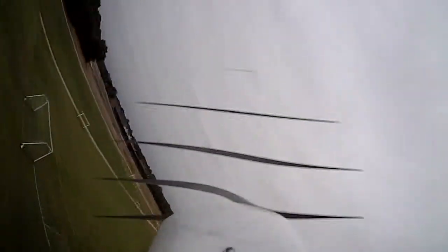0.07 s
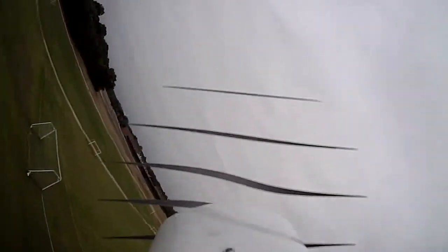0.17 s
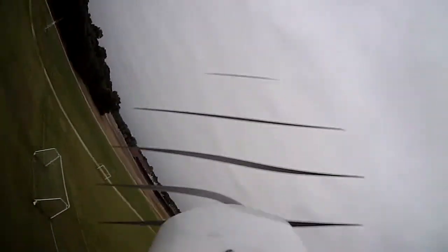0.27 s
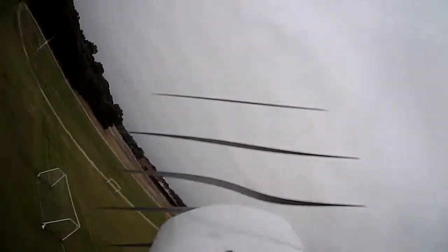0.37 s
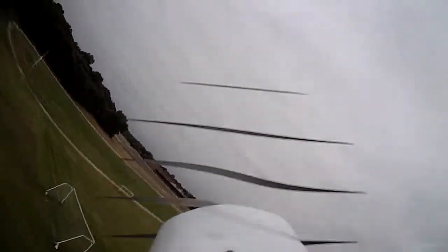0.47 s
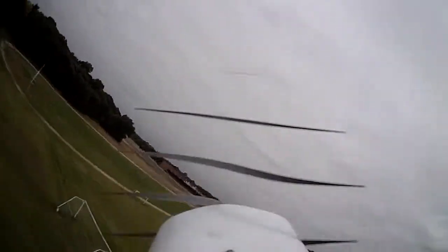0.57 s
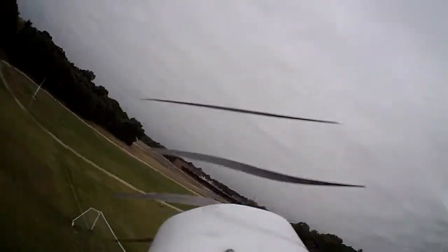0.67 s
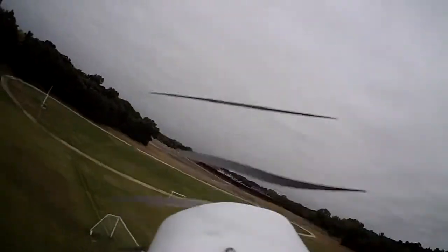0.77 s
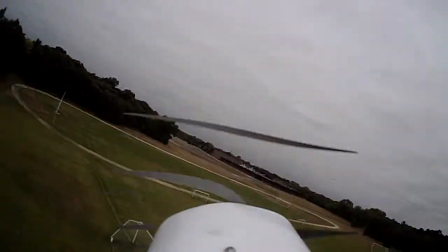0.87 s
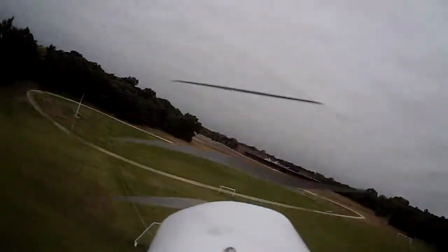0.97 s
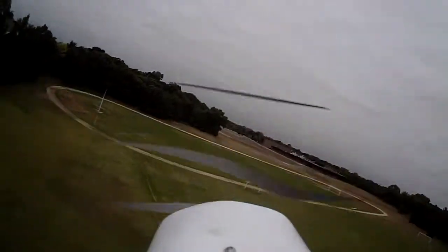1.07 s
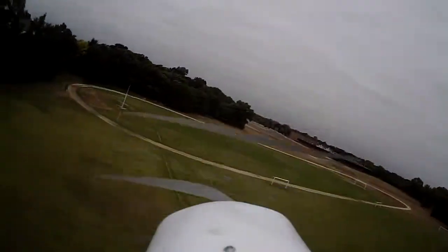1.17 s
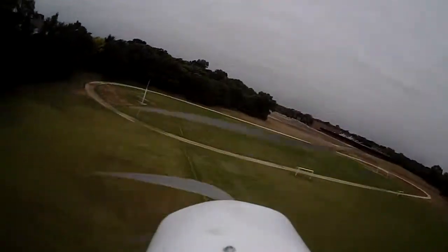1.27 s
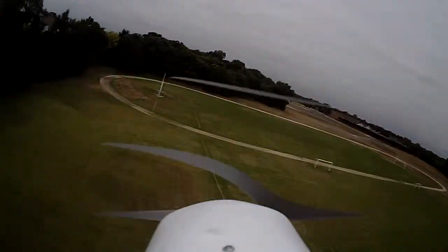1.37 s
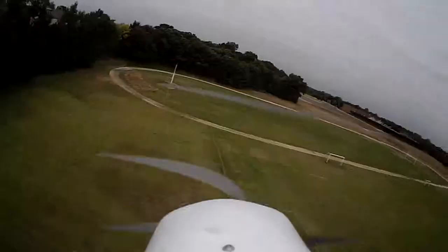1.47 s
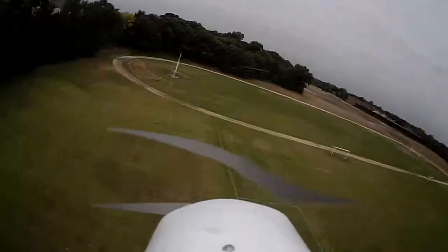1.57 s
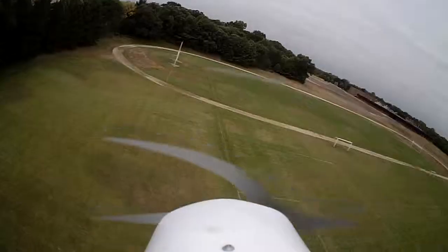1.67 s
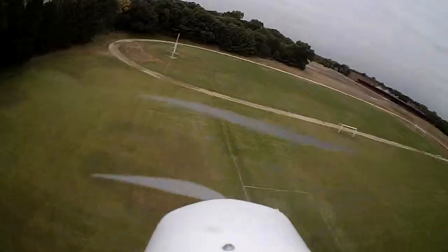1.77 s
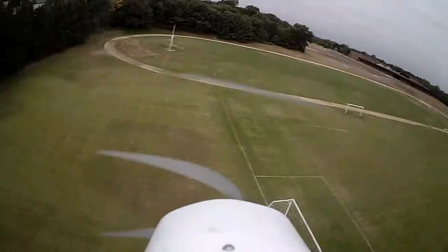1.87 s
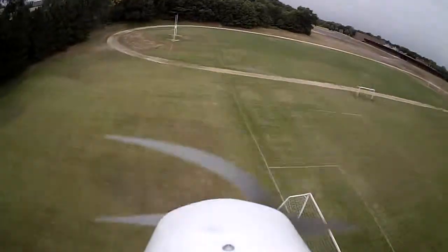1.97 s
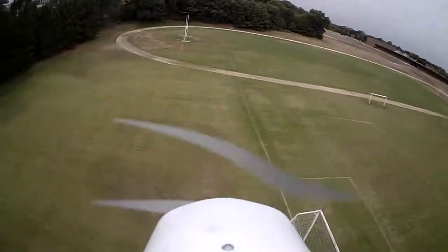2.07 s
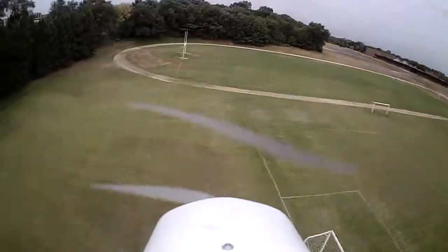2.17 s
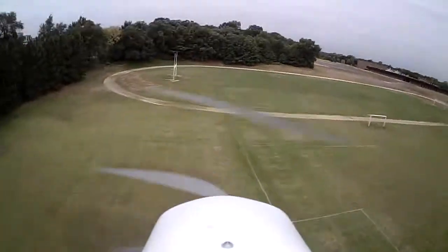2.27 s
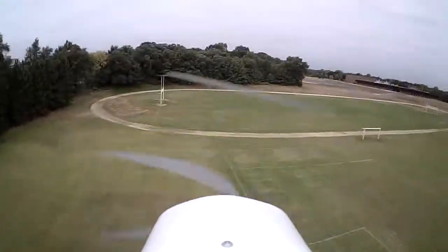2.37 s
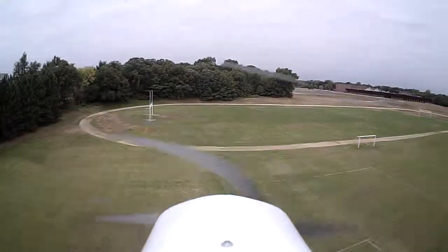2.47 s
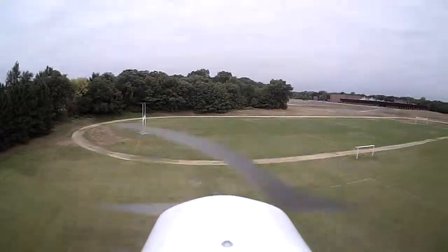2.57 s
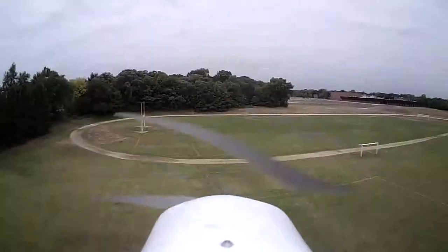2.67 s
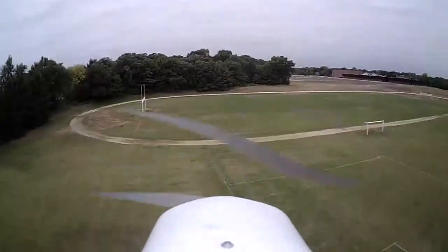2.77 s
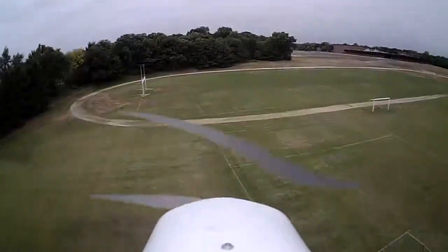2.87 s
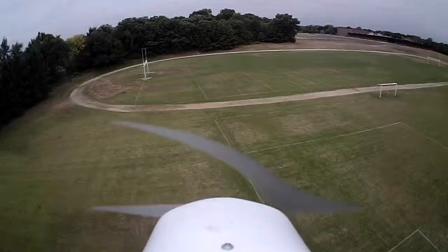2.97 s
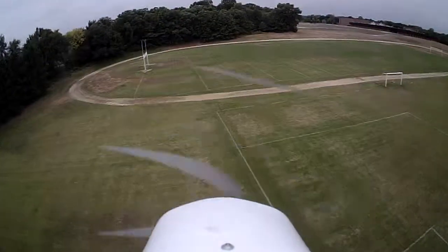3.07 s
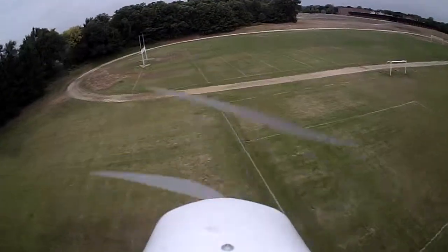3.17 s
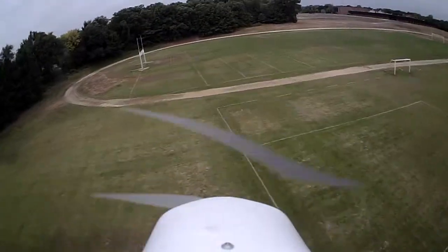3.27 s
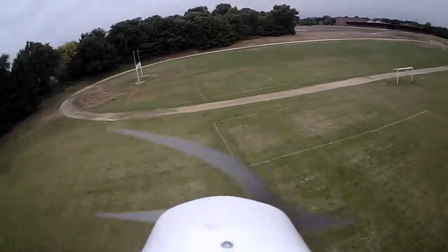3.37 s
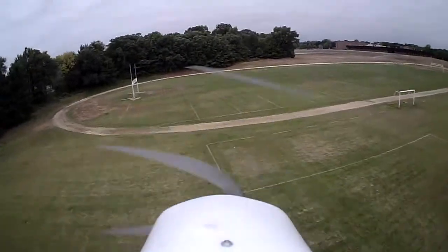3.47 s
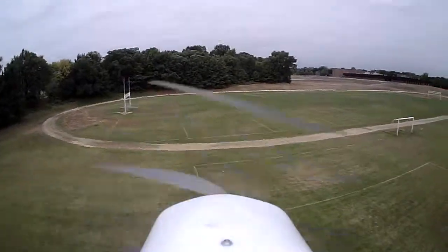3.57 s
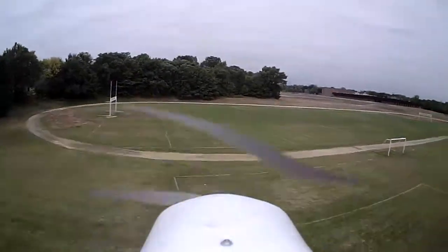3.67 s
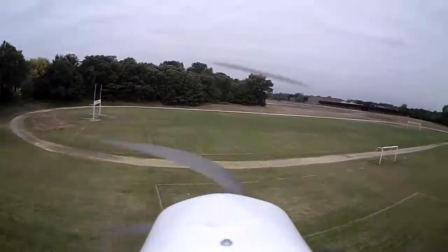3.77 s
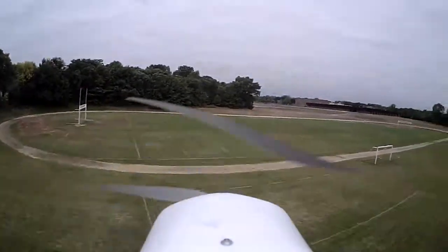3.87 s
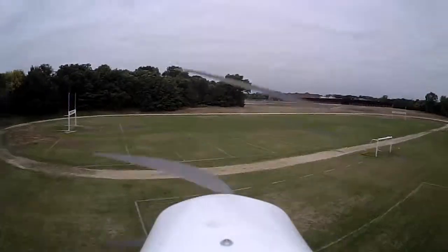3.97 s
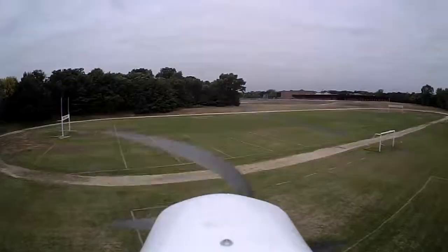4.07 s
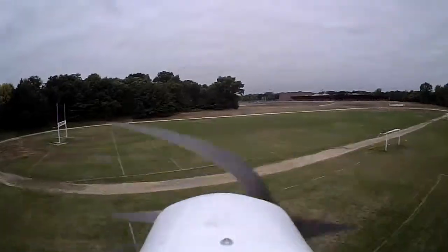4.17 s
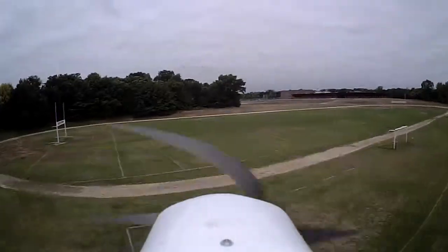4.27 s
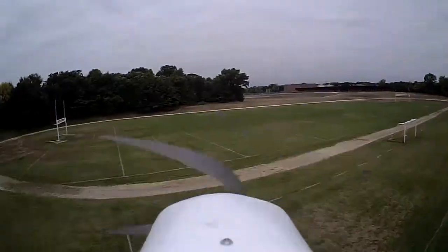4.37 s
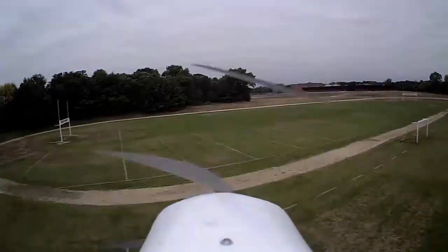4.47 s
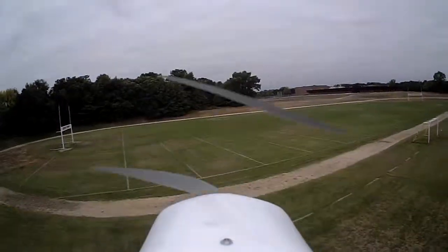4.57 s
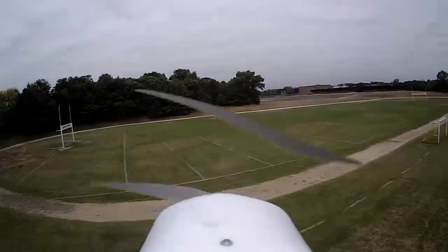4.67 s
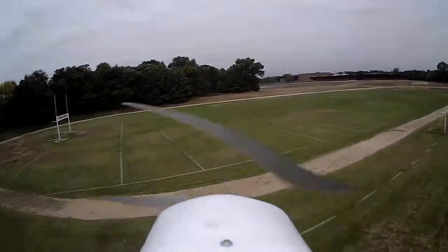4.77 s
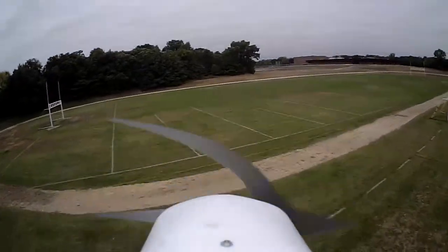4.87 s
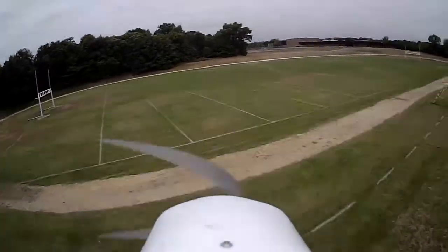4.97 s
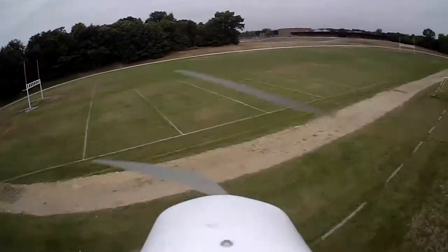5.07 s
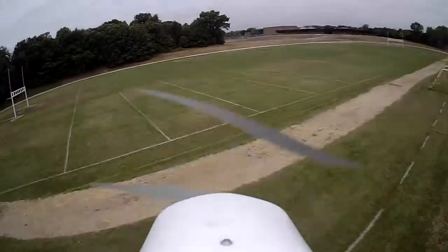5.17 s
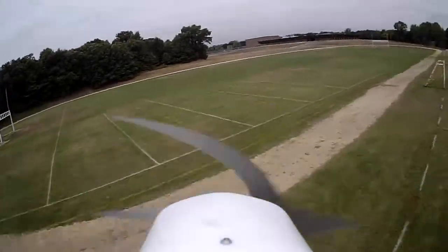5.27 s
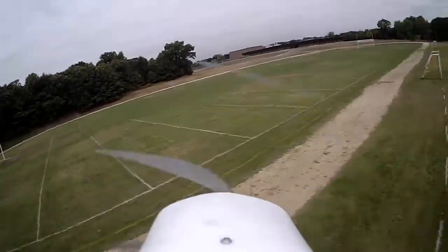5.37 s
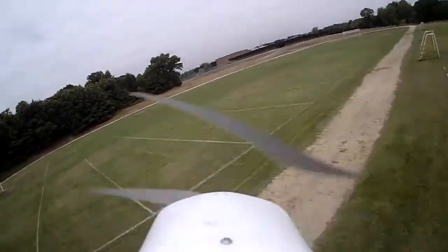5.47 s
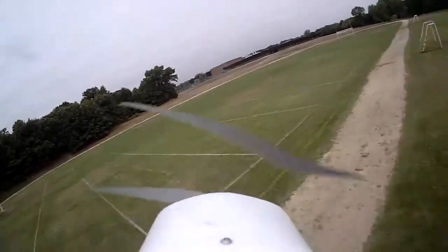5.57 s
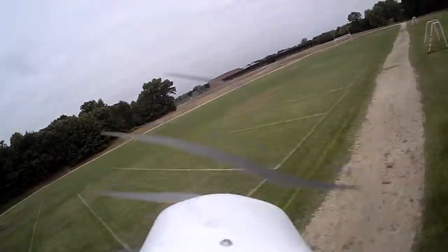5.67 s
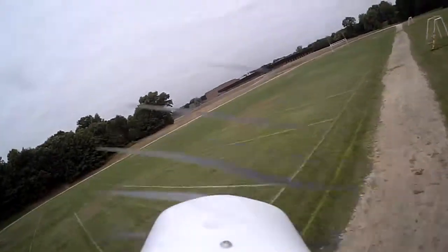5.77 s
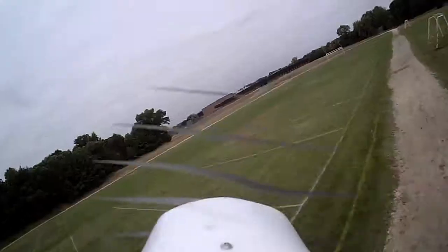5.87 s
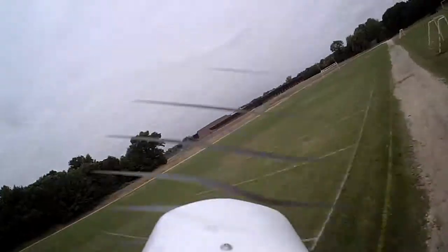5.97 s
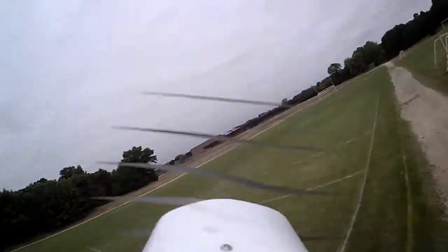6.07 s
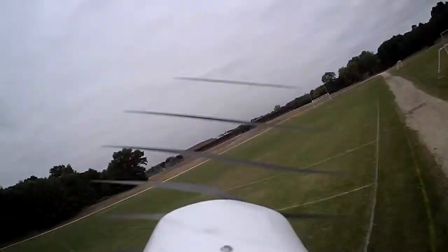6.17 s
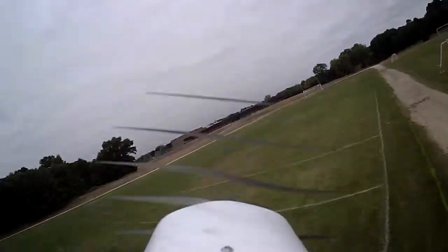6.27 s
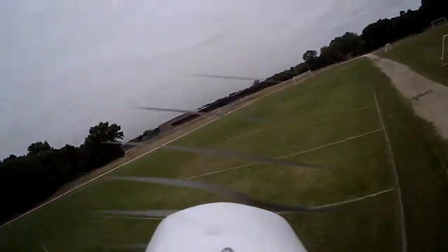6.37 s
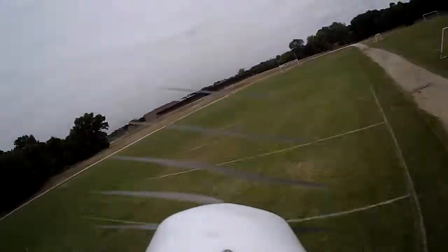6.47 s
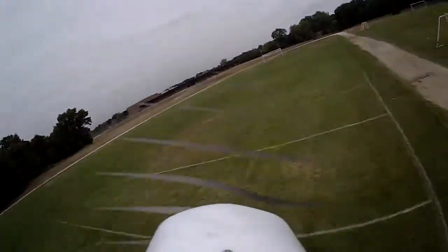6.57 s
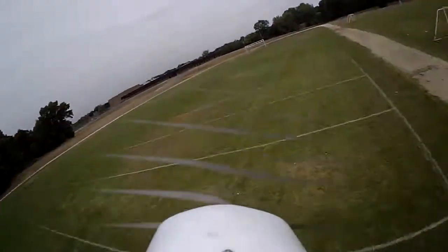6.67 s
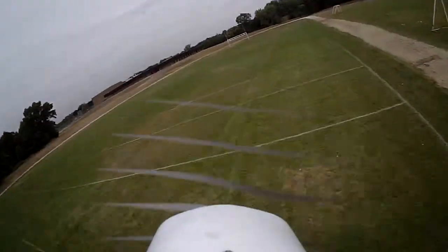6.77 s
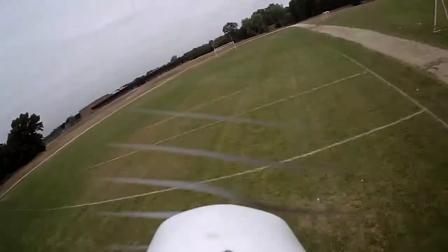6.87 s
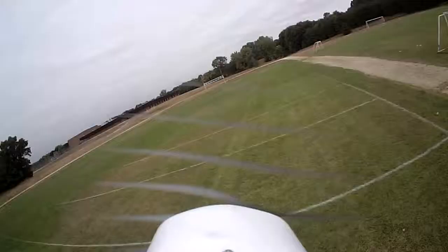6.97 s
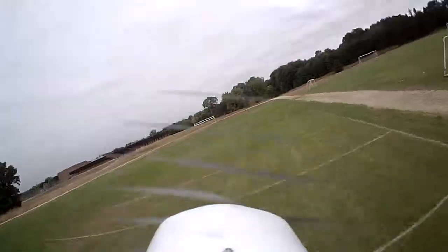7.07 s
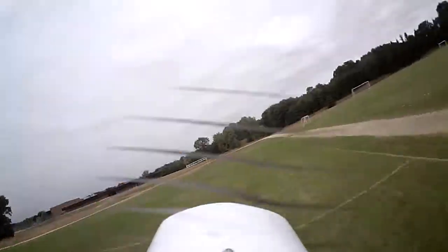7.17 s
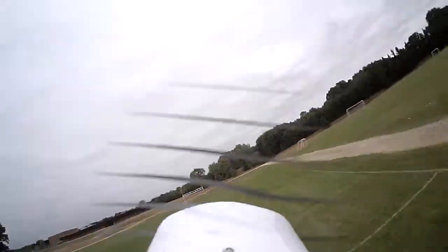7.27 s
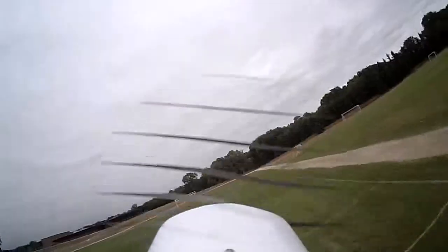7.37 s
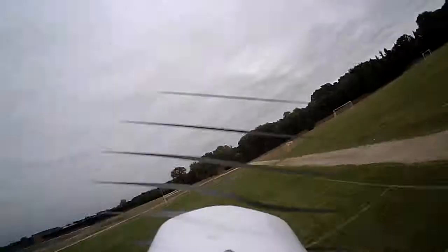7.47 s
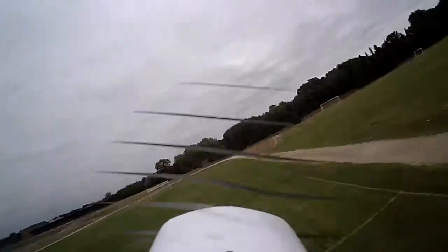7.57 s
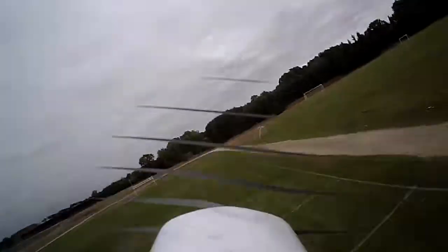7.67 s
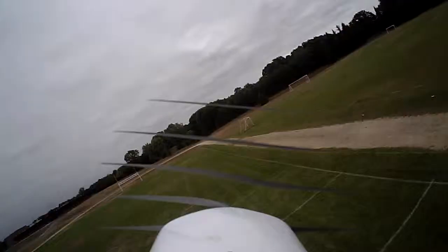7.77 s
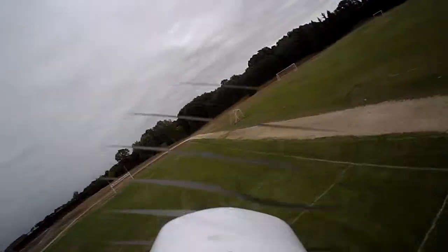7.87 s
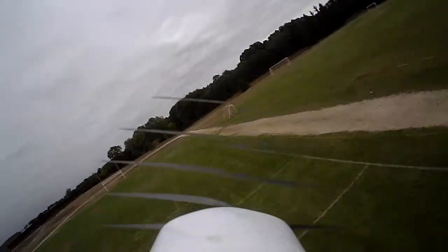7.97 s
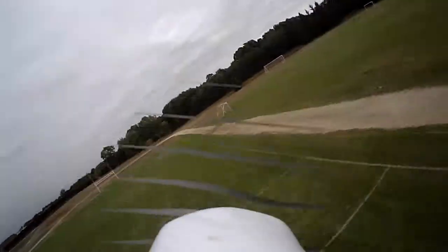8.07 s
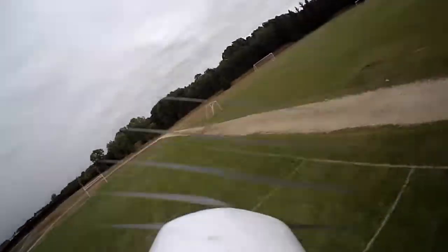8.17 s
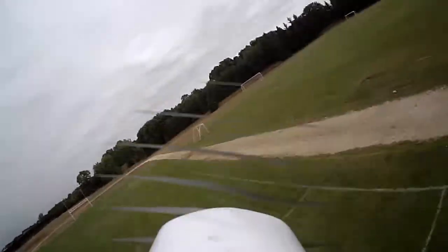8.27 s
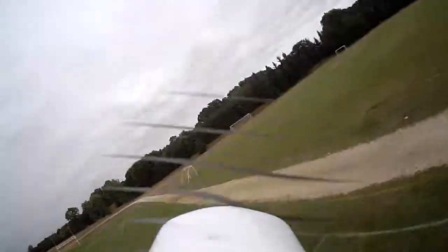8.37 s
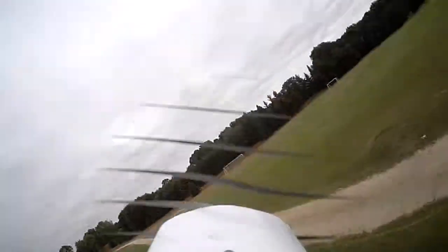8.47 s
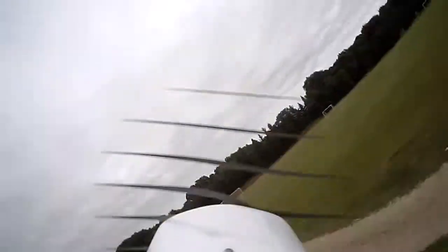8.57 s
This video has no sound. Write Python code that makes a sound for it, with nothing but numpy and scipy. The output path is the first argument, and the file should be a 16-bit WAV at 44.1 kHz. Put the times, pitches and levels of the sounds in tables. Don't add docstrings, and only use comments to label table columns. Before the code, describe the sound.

Heard from the nose of a small electric model plane over an open field: a buzzing propeller and thin motor whistle, quickly cut. The blades run down to a low flutter while wind puffs and tiny crackles brush the microphone. Late on, the motor whines back up and the buzz returns with heavy, crackling wind roar that overloads the microphone.

```python
import sys
import numpy as np
from scipy import signal
from scipy.fft import rfft, irfft, next_fast_len
from scipy.io import wavfile
from scipy.ndimage import uniform_filter1d, map_coordinates

SR = 44100
rng = np.random.default_rng(int(sys.argv[2]) if len(sys.argv) > 2 else 0)


def master_out(mix):
    frames = np.transpose(np.atleast_2d(mix))
    ceiling = np.clip(frames, -1, 1)
    pcm = np.round(ceiling * 32767).astype(np.int16)
    wavfile.write(sys.argv[1], SR, pcm)


def volts(x):
    e = np.asarray(x, float) / 20
    return 10 ** e


N = 380141
CUT_S = 0.55

# blade rate in Hz, levels in dB of blade tone, 2nd harmonic,
# 3rd harmonic, depth in dB of wash chopping.
BLADE_LAW = [(65.6, -42.5, -48, -61, 5), (81.4, -40.5, -40, -50, 4), (96, -39, -38, -48, -2),
             (121, -27.5, -31.5, -35.5, 2), (172, -31, -34, -35, 0), (213, -28, -33.5, -38, 5),
             (250, -29, -30.5, -36, 1.5)]


def unit(x):
    return x / np.sqrt(np.mean(x ** 2) + 1e-20)


def law(rows, control):
    x, *cols = np.transpose(rows)
    return [np.interp(control, x, c) for c in cols]


def curves(rows):
    return law(rows, np.arange(N) / SR)


def swells(rows):
    middle_s, half_s, *db = np.transpose(rows)
    t = np.arange(0, N / SR + 0.002, 0.001)
    shape = np.exp(-abs((t[:, None] - middle_s) / half_s) ** 2.4)
    return curves(np.column_stack([t, shape @ np.transpose(db)]))


def wobble(rate):
    return map_coordinates(rng.standard_normal(int(N * rate / SR) + 4), [np.arange(N) * rate / SR])


def coloured(x, spectrum):
    m = next_fast_len(N + 8192)
    hz, db = np.transpose(spectrum)
    log_hz = np.log(np.fft.rfftfreq(m, 1 / SR) + 1)
    gain = volts(np.interp(log_hz, np.log(hz + 1), db, left=-120, right=-120))
    return irfft(rfft(x, m) * gain, m)[:N]


def patchy(depth_db):
    z = signal.stft(rng.standard_normal(N + 512), nperseg=512)[2]
    field = uniform_filter1d(rng.standard_normal(z.shape), size=6, axis=0)
    field = uniform_filter1d(field, size=8, axis=1)
    return signal.istft(z * volts(depth_db * unit(field)), nperseg=512)[1][:N]


def spool():
    middle_s, steepness_per_s = 5.743, 16.4
    return 1 / (1 + np.exp(steepness_per_s * (middle_s - np.arange(N) / SR)))


def throttle():
    open_s, ramp_s = 6.3, 0.092
    t = np.arange(N) / SR
    closing = 1 / (1 + np.exp((t - CUT_S) / ramp_s))
    opening = 1 / (1 + np.exp((open_s - t) / ramp_s))
    return closing + opening


def blade_rate():
    # time in seconds, blade rate in Hz.
    powered = [(0, 204.3), (.5, 205), (5.8, 222.1), (6, 223.9), (6.22, 228), (6.6, 228.8), (7.28, 265.1),
               (7.48, 272), (7.85, 255.8), (8.15, 264.5), (8.34, 251), (8.62, 241.5)]
    # time in seconds, blade rate in Hz.
    windmill = [(1, 81), (1.45, 87), (1.9, 79), (2.6, 80.3), (3.4, 78), (4.2, 69.5), (4.6, 68), (5.2, 68),
                (5.5, 65)]
    soft_s, coast_s = 0.04, 0.4
    coasting_s = soft_s * np.logaddexp(0, (np.arange(N) / SR - CUT_S) / soft_s)
    driven = np.exp(-coasting_s / coast_s) + spool()
    return curves(windmill)[0] * (1 - driven) + curves(powered)[0] * driven


def blade_angle(blade_hz):
    return 2 * np.pi * np.cumsum(blade_hz * (1 + 0.00889 * wobble(25))) / SR


def propeller(blade_hz, angle):
    # middle in seconds, half length in seconds, blade tone lift in dB,
    # overtone lift in dB.
    bites = [(.2, .42, 10, 3), (.1, .15, 0, 3), (.33, .07, 0, -12), (.45, .06, 0, 3), (.6, .11, 2, 10),
             (.77, .08, 0, 3), (1.03, .13, 2, 4), (1.6, .2, -6, -4), (1.85, .07, 0, 8), (2.1, .25, 8, 0),
             (3.15, .05, 6, 8), (3.32, .2, 8, 5), (3.9, .08, 3, -4), (4.25, .2, -4, -5), (5.4, .15, -4, -2),
             (4.6, .1, 2, 9), (4.98, .2, 8, 3), (5.72, .08, -5, -12), (6.05, .2, 12, -7), (6.21, .05, 3, 9),
             (7.1, .12, -2, -5), (7.38, .13, 16, 3), (8.26, .1, 2, 3), (8.45, .3, 13, 0)]
    bite_db, overtone_db = swells(bites)
    tone_db = np.array(law(BLADE_LAW, blade_hz)[:3]) + [bite_db, overtone_db, overtone_db]
    unsteady_db = np.clip(220 / blade_hz, 1, 3)
    tone = 0
    for k, db in enumerate(tone_db):
        harmonic_db = db + unsteady_db * np.clip(wobble(19), -3, 1)
        tone = tone + volts(harmonic_db) * np.cos((k + 1) * angle)
    shaft_db = -57.5 + 25.5 * (blade_hz / 250) ** 3
    unbalance = volts(shaft_db + 1.5 * wobble(9)) * np.cos(angle / 2)
    return -np.sqrt(2) * (tone + unbalance)


def air(blade_hz):
    # time in seconds, flow in dB.
    flow = [(0, -22), (.46, -18), (.6, -18), (.81, -24), (1.27, -29), (1.61, -34), (3, -33.5), (3.7, -34),
            (4.3, -37), (5.5, -37.5), (5.76, -31.5), (5.91, -22.5), (6.3, -19), (6.75, -15), (7.1, -16),
            (7.4, -13.5), (7.9, -13), (8.6, -16.5)]
    # flow in dB, levels in dB of buffet, fizz, crackle.
    eddy_law = [(-39.5, -35, -68.5, -92), (-33, -28, -58, -76), (-26.5, -25.5, -44.5, -57),
                (-19.5, -23.5, -33.5, -50), (-12, -16.5, -25.5, -43)]
    # middle in seconds, half length in seconds, rumble lift in dB,
    # hiss lift in dB.
    gusts = [(2.05, 0.48, 3, 10), (2.24, .03, -1, 4), (2.6, .05, 1, 1), (2.9, .02, 6, 7),
             (2.98, .04, -7, -2.5), (3.3, 0.24, 4, 10.5), (3.14, 0.018, 7, 1.5), (7.02, 0.11, 1, 2.5),
             (3.62, 0.051, 3, -6), (3.7, .02, -4, 4), (4.57, 0.15, 4.5, 0.5), (4.68, 0.073, -0.5, 5),
             (5.11, 0.15, 6, 12.5), (5.37, 0.027, 4, 6.5), (5.85, .25, 4, 3), (6.17, 0.011, 10, 3.5),
             (6.3, 0.028, 7.5, 0.5), (6.35, .02, -4, -1), (6.48, 0.088, 5, -1.5), (6.55, 0.059, -4, -2.5),
             (6.63, 0.013, 4, 0.5), (6.71, 0.045, -7, -1), (6.84, 0.058, 2, -3.5), (7.29, .18, 6, 1.2),
             (7.53, 0.044, -5.5, -3), (7.62, 0.036, 1.5, 1.5), (7.9, 0.2, -7, -1.5),
             (8.31, 0.071, -1.5, 1.5), (8.48, 0.27, 6, 3), (8.62, .015, -15, -2)]
    # middle in seconds, half length in seconds, crackle lift in dB.
    puffs = [
        (2.61, .06, 7),
        (3.35, .06, 0),
        (4.68, .06, 16),
        (5.15, 0.045, 1),
        (5.68, 0.16, 11),
        (6.75, 0.066, 1.5),
        (8.05, 0.27, 0),
    ]
    flow_db, = curves(flow)
    rumble_db, hiss_db = swells(gusts)
    buffet_db, fizz_db, crackle_db = law(eddy_law, flow_db)
    flutter_db = 6 * np.clip((blade_hz - 201.5) / 9.9, 0, 1)
    buffet_db = buffet_db + rumble_db + flutter_db
    roar_db = flow_db + 0.15 * rumble_db + 0.46 * hiss_db
    crackle_db = crackle_db + 1.52 * hiss_db + flutter_db + swells(puffs)[0]
    crackle_db += 6 * throttle()
    return buffet_db, roar_db, fizz_db + hiss_db, crackle_db


def wash(blade_hz, angle, levels_db):
    # frequency in Hz, density in dB per Hz.
    buffet_spectrum = [(15, -36), (30, -7), (64, -10), (120, 1), (250, 0.5), (350, -5), (600, -20)]
    roar_spectrum = [(150, -41), (300, -1.5), (450, -0.5), (650, -4), (950, -7.5), (1650, -10.5),
                     (2000, -17.5), (2500, -28.5), (3500, -45)]
    fizz_spectrum = [(1500, -8), (2300, -1.5), (3450, -3.5), (4100, -3), (5100, -7.5), (6100, -17.5),
                     (6750, -11), (7400, -26), (8250, -30), (8900, -25.5), (9800, -45.5), (12000, -34),
                     (15500, -50)]
    crackle_spectrum = [(2000, -41), (4000, -2.5), (7000, 0.5), (11000, -5.5), (15500, -11)]
    slow_spectrum = [(3000, -11), (6500, 8.5), (9100, -5), (10000, -14), (15500, -15)]
    # frequency in Hz, density in dB per Hz.
    sway_spectrum = [(12, -25), (28, -2.5), (60, -4.5), (95, -2), (160, -32)]
    buffet_db, roar_db, fizz_db, crackle_db = levels_db
    chop_db = law(BLADE_LAW, blade_hz)[-1] * np.cos(angle)
    gust = wobble(11)
    sparse = np.clip((-48 - crackle_db) / 20, 0, 1)

    buffet = unit(coloured(patchy(depth_db=0.97) * volts(1.3 * gust), buffet_spectrum))
    dip = np.clip(-buffet, -2.5, 2.5)
    roar_gain_db = 0.48 * chop_db + 0.19 * gust + 1.06 * dip
    roar = unit(coloured(patchy(depth_db=0.66) * volts(roar_gain_db), roar_spectrum))

    bunch_db = 0.8 * gust + 1.6 * dip
    ticks_db = (1 + 3.2 * sparse) * wobble(900)
    fizz_gain_db = 0.6 * chop_db + bunch_db + 1.15 * ticks_db
    fizz = unit(coloured(patchy(depth_db=0.35) * volts(fizz_gain_db), fizz_spectrum))

    spike_db = 1.4 * chop_db + bunch_db + (1.6 + 2.4 * sparse) * wobble(900)
    spikes = rng.standard_normal(N) * volts(spike_db)
    crackle = (1 - sparse) * coloured(spikes, crackle_spectrum) + sparse * coloured(spikes, slow_spectrum)
    crackle /= np.sqrt(abs(uniform_filter1d(crackle ** 2, size=9000)))

    low = volts(buffet_db - 3.5) * buffet + volts(roar_db) * roar
    swing = volts(buffet_db) + volts(roar_db)
    low -= 0.05 * (low ** 2 / swing - swing / 2) * np.clip(2 - swing / 0.15, 0, 1)
    low += volts(0.5 * buffet_db - 22.5) * unit(coloured(patchy(depth_db=1.8), sway_spectrum))
    return low + volts(fizz_db - 0.2) * fizz + volts(crackle_db + 2.5 + 0.72 * sparse) * crackle


def drive(angle):
    # time in seconds, whistle level in dB.
    ripple = [(0, -43.5), (.5, -46), (.8, -58), (1.25, -57), (1.31, -100), (5.49, -100), (5.51, -62),
              (5.57, -48), (5.67, -42.5), (5.88, -48), (6.3, -43), (7, -49), (7.3, -60), (8.62, -73)]
    # blade-rate multiple, level in dB.
    sidebands = [(1, -6), (2, -8), (7, -4), (21, -4), (42, -11)]
    # frequency in Hz, gain in dB.
    mount_path = [(3000, -6), (5200, 2), (7200, 0), (8200, -9), (12000, -9), (15000, -20)]
    # frequency in Hz, gain in dB.
    nose_path = [(2400, -17), (3200, -15), (3650, 5), (4100, -8), (5200, -26)]
    switch_hz = 7250
    whistle_db, = curves(ripple)
    power_share = spool()
    surge = 4 * power_share * (1 - power_share)
    side_db = whistle_db - 20 + 4 * surge
    whine_db = whistle_db - 23 + 23 * 1.7 * surge * power_share

    carrier = 2 * np.pi * switch_hz * np.arange(N) / SR + 0.48 * wobble(12)
    whistle = volts(whistle_db + 1.8 * wobble(27)) * np.sin(carrier)
    overtone = volts(np.minimum(whistle_db - 29, -85)) * np.sin(2 * carrier + 1.5 * wobble(40))
    modulation = sum(volts(db + 4 * wobble(50)) * np.cos(k * angle + 2.2 * wobble(250))
                     for k, db in sidebands)
    sides = volts(side_db) * modulation * np.sin(carrier)
    commutation = np.sin(42 * angle + 1.5 * wobble(150))
    difference = np.sin(carrier - 42 * angle + 1.5 * wobble(150))
    crossing = volts(side_db + 1.5 + 3 * wobble(60)) * (commutation + difference)
    whine = volts(whine_db + 2 * wobble(60)) * np.sin(21 * angle + 0.7 * wobble(90))
    through_nose = coloured(volts(4) * crossing + whine, nose_path)
    return np.sqrt(2) * (whistle + overtone + coloured(sides, mount_path) + through_nose)


def input_hiss():
    return volts(-76) * coloured(rng.standard_normal(N), [(100, -2), (14300, 4), (15800, -8)])


def membrane_dips():
    # time in seconds, depth in dB, width in seconds.
    thumps = [
        (2.234, -16, .0016),
        (2.905, -14, .0026),
        (3.018, -21, .0006),
        (3.154, -17, .0016),
        (6.562, -5, .0008),
    ]
    t = np.arange(N) / SR
    dips = 0
    for s, db, width_s in thumps:
        u = ((t - s) / width_s) ** 2
        dips = dips + volts(db) * (1 - u) * np.exp(-u)
    return -dips


def snaps(fizz_db):
    # time in seconds, peak in dB.
    sharp = [(2.0527, -40), (2.15, -33), (2.173, -35), (2.2109, -38), (2.231, -30), (2.2817, -34),
             (2.2887, -29), (2.3311, -34), (2.3426, -29), (2.3795, -36), (2.4156, -36), (2.5735, -39),
             (2.6254, -36), (2.6973, -45), (2.9023, -27), (3.3348, -35), (3.3722, -23), (3.4251, -39),
             (3.4371, -37), (3.458, -27), (3.6565, -37), (3.68, -30), (3.7623, -40), (4.4578, -44),
             (4.6015, -43), (4.7351, -36), (5.0719, -48), (5.3537, -54), (5.368, -48), (5.3822, -33)]
    # frequency in Hz, gain in dB.
    snap_spectra = [
        [(3500, -22), (5500, -1), (9500, -15), (11500, -25)],
        [(1000, -14), (2200, 9), (4600, 2.5), (6500, -20)],
        [(8500, -20), (10500, -1), (13500, -2), (15600, -14)],
    ]
    chance = rng.random((110, 2))
    small_s = 0.75 + chance[:, 0] * (5.8 - 0.75)
    small_db = fizz_db[(small_s * SR).astype(int)] + 6 + 4 * (2 * chance[:, 1] - 1)
    more = [(2.9095, -33), (3.219, -40), (2.4293, -35)]
    start_s, peak_db = np.transpose([*zip(small_s, small_db), *sharp, *more])

    tint_db = rng.standard_normal((len(start_s), 2)) * [2.2, 3.5]
    lower_db = -0.55 * (peak_db + 45) - 2.5 + tint_db[:, 0]
    upper_db = -28 + tint_db[:, 1]
    band_db = np.column_stack([np.full(len(start_s), 9), lower_db + 16, upper_db + 21])

    t = np.arange(200) / SR
    envelope = volts(-60 * t / 0.0046) * (1 - np.exp(-t / 0.00057))
    bursts = rng.standard_normal((len(start_s), 3, len(t))) * envelope
    tracks = np.zeros((3, N))
    for s, db, tilt_db, burst in zip(start_s, peak_db, band_db, bursts):
        start = round((s + 0.0008) * SR)
        tracks[:, start:start + len(t)] += volts(db + tilt_db[:, None]) * burst
    return sum(coloured(x, spectrum) for x, spectrum in zip(tracks, snap_spectra))


def scene():
    blade_hz = blade_rate()
    angle = blade_angle(blade_hz)
    levels_db = air(blade_hz)
    mix = propeller(blade_hz, angle) + wash(blade_hz, angle, levels_db) + drive(angle) + input_hiss()
    mix += snaps(levels_db[2]) + membrane_dips()
    return mix[None]


def top_cut(x):
    return signal.sosfilt(signal.butter(12, 15720, fs=SR, output="sos"), x)


def record(dry):
    top, knee = 0.71, 5
    return top_cut(dry / (1 + np.abs(dry / top) ** knee) ** (1 / knee))


dry = scene()
out = record(dry)
master_out(out)
```